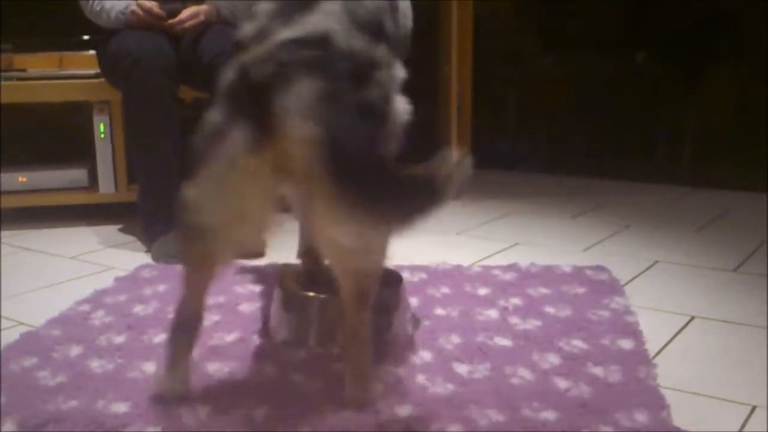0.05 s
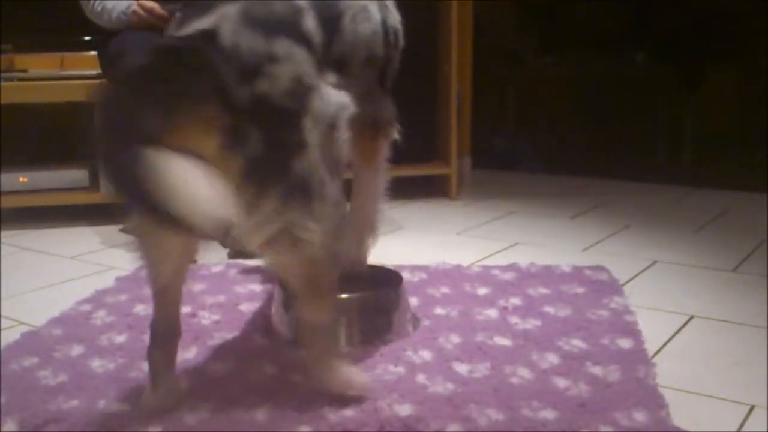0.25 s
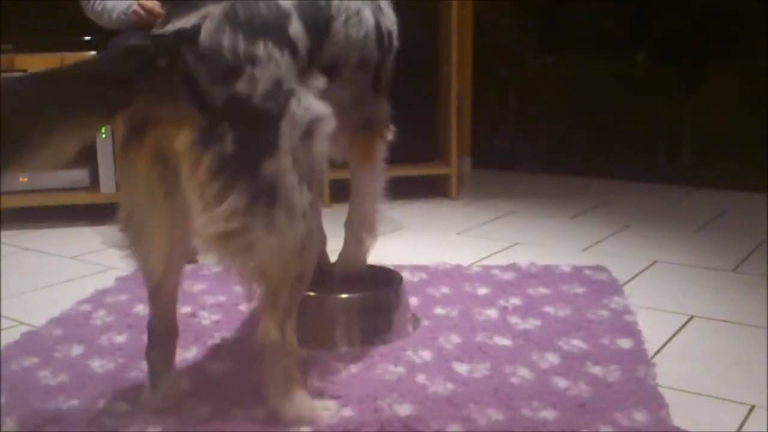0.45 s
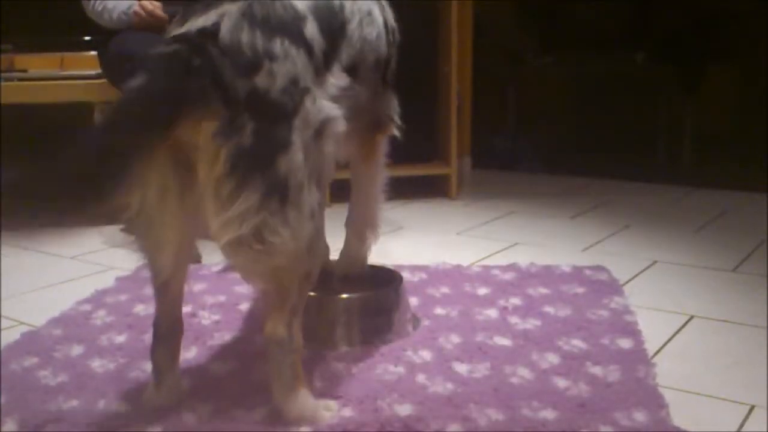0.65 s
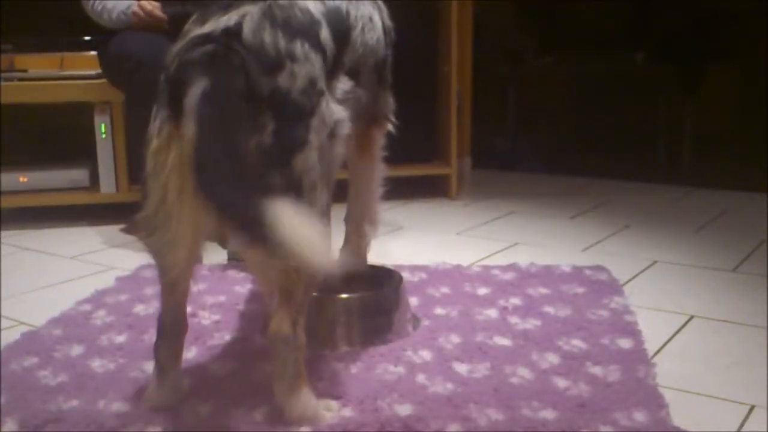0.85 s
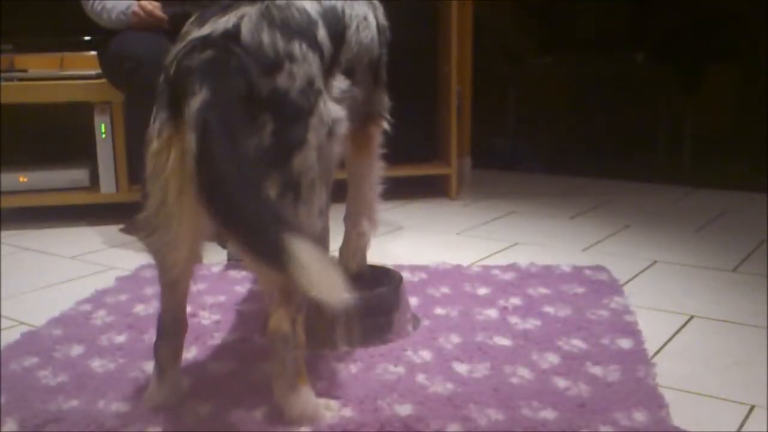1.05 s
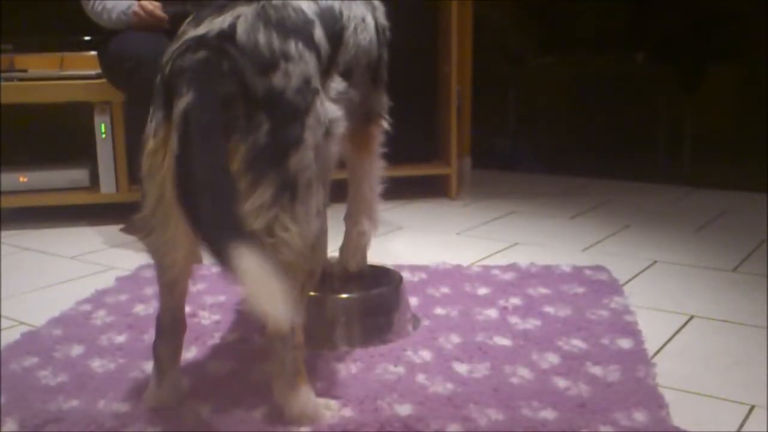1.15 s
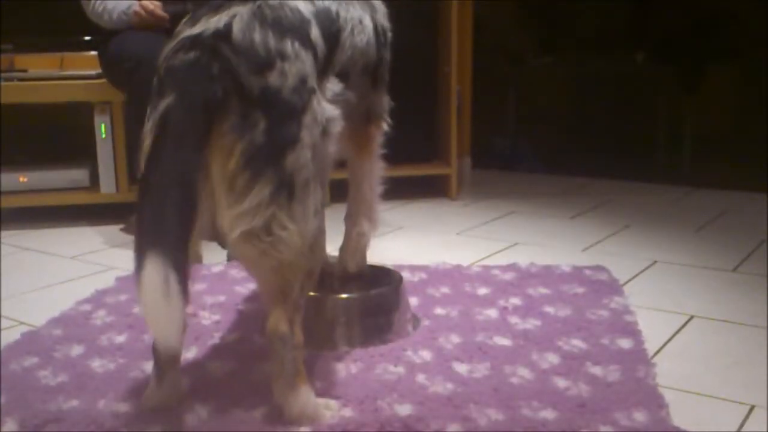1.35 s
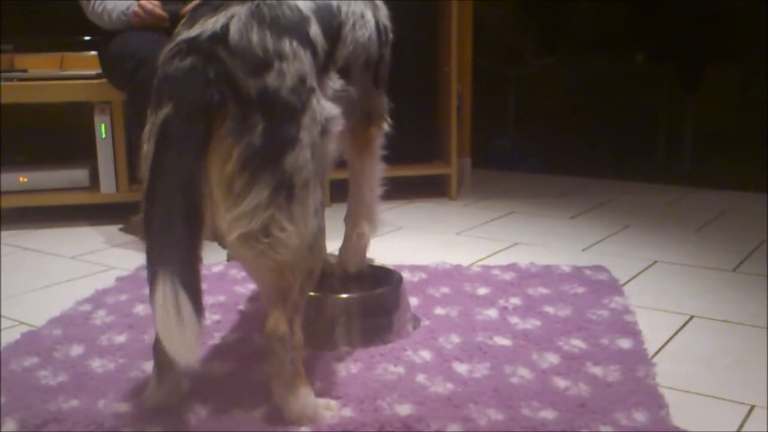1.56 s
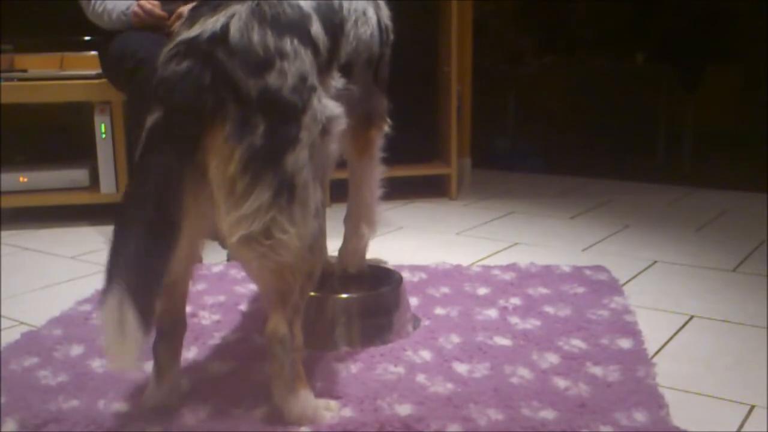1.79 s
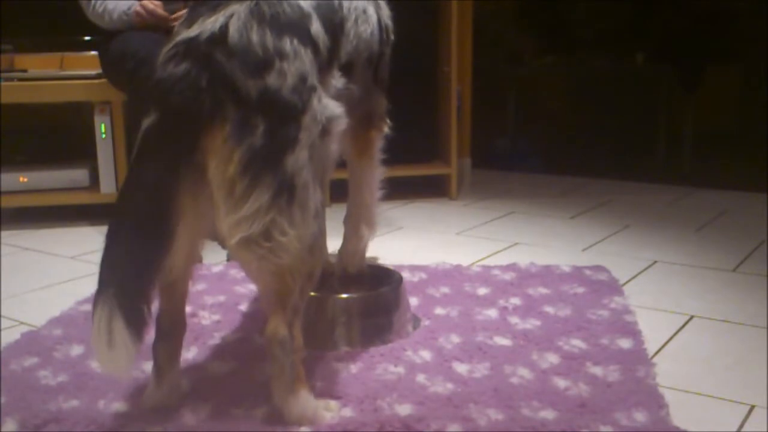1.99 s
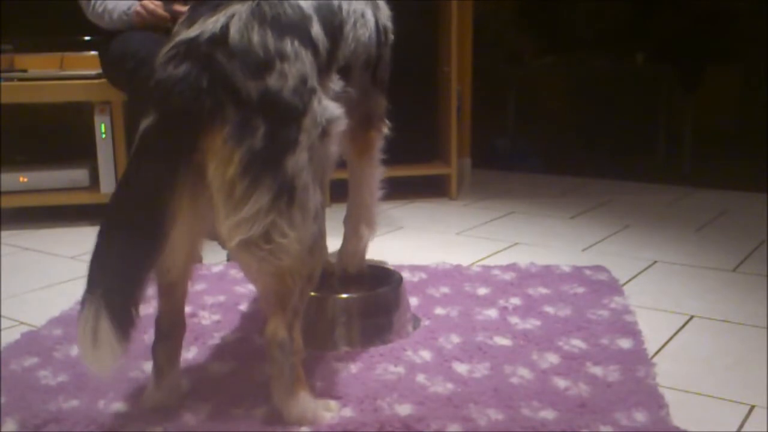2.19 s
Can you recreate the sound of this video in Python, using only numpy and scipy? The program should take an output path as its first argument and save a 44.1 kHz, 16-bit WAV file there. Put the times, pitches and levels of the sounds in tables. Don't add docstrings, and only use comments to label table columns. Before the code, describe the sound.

A loud training clicker dominates: a small tick at 0.18 seconds, a sharp metallic snap at 0.23 and another at 0.44, left of the microphone, clipped and ringing off tiled walls. Faint claw ticks on a metal bowl precede it near 0.07. Soft paw knocks and light scrapes follow at 0.6 to 0.8, 1.05 to 1.45, 1.7 and 2.05, with faint coat rustle around 0.7 to 1.3 and steady hiss.

```python
import sys
import numpy as np
from scipy import signal
from scipy.fft import rfft, irfft, next_fast_len
from scipy.io import wavfile
from scipy.ndimage import map_coordinates

SR = 44100
rng = np.random.default_rng(int(sys.argv[2]) if len(sys.argv) > 2 else 0)


def wav_out(sig):
    wavfile.write(sys.argv[1], SR, np.round(np.clip(np.atleast_2d(sig).T, -1, 1) * 32767).astype(np.int16))


def convert_level_to_amplitude(level_db):
    exponent = np.asarray(level_db, float) / 20
    return 10 ** exponent


N = 97020
TIME = np.arange(N) / SR
TOUCH_AT, PRESS_AT, RELEASE_AT = 0.1791, 0.2296, 0.4392


def along(points, hz):
    f, value = np.transpose(points)
    return np.interp(np.log(hz + 1), np.log(f + 1), value)


def filtered(x, response):
    size = next_fast_len(N + SR // 2)
    hz = np.fft.rfftfreq(size, 1 / SR)
    return irfft(rfft(x, size) * response(hz), size)[..., :N]


def causal(gain):
    def response(hz):
        cepstrum = irfft(np.log(gain(hz) + 1e-6))
        half = len(cepstrum) // 2
        cepstrum[1:half] *= 2
        cepstrum[half + 1:] = 0
        return np.exp(rfft(cepstrum))
    return response


def struck(start_s, db, decay_s, ring, rattle=1):
    def resonances(hz):
        power = 0
        for centre, width, level in ring:
            damping = (hz * width) ** 2
            power = power + convert_level_to_amplitude(level) ** 2 * damping / ((centre ** 2 - hz ** 2) ** 2 + damping)
        return np.sqrt(power)

    t = np.arange(SR // 10) / SR
    blow = (rattle * rng.standard_normal(len(t)) + (t == 0)) * np.exp(-t / decay_s)
    x = np.zeros(N)
    x[round(start_s * SR):][:len(t)] = blow
    y = filtered(x, causal(resonances))
    return convert_level_to_amplitude(db) * y / np.linalg.norm(y) * np.sqrt(SR / 200)


# delay t/s, left level/dB, right
# level/dB
WALL_PATHS = [(0, 3, -3), (.0012, 0, -5), (.0036, -7, -4), (.0066, 3, -3), (.0085, -1, -5), (.0118, 0, -1),
              (.0155, -5, -4), (.0215, -3, -5), (.033, -6, -4), (.038, -8, -8)]
# f/Hz, T60 t/s
REVERBERATION = [(300, .3), (1000, 0.84), (2000, 0.61), (3500, .55), (6000, 0.43), (10000, 0.29),
                 (15000, .24)]
# f/Hz, coherence [0-1]
COHERENCE = [(300, 0.74), (1500, .2), (3000, .3), (4500, .6), (7500, 0.44), (9000, .1), (15000, .3)]


def room(x, tail_db, paths):
    hz, t, z = signal.stft(rng.standard_normal((2, SR)), SR, nperseg=128)
    late = convert_level_to_amplitude(-60 * t / along(REVERBERATION, hz)[:, None])
    early = convert_level_to_amplitude(6.5 - 60 * t / 0.15)
    like = np.clip(along(COHERENCE, hz), 0, 1)[:, None]
    z = np.array([z[0], like * z[0] + np.sqrt(1 - like ** 2) * z[1]])
    tail = signal.istft(z * (late + early), SR, nperseg=128)[1][:, :SR]
    t = np.arange(SR) / SR
    tail *= 1 - np.exp(-t / 0.011)
    tail *= convert_level_to_amplitude(tail_db) / np.linalg.norm(tail, axis=1, keepdims=True)
    t = t[:200]
    for delay_s, left_db, right_db in paths:
        if delay_s:
            pulse = rng.standard_normal((2, 200)) * np.exp(-t / 0.0004)
        else:
            pulse = (t == 0) * np.ones((2, 1))
        pulse = pulse / np.linalg.norm(pulse, axis=1, keepdims=True)
        tail[:, round(delay_s * SR):][:, :200] += convert_level_to_amplitude([[left_db], [right_db]]) * pulse
    return signal.fftconvolve(x[None], tail, axes=1)[:, :N]


# f/Hz, density level/dB (per Hz)
HISS_SPECTRUM = [(25, -7), (60, 3), (200, -0.5), (600, -5), (1700, -7), (2400, -11.5), (11000, -15),
                 (15800, -20.5)]


def hiss():
    x = filtered(rng.standard_normal((2, N)), lambda hz: convert_level_to_amplitude(along(HISS_SPECTRUM, hz)))
    drift = map_coordinates(rng.standard_normal(30), [TIME * 8])
    dips = 0
    for snap_s in (PRESS_AT, RELEASE_AT):
        dips = dips + np.exp(-((TIME - snap_s - 0.075) / 0.035) ** 4)
    return convert_level_to_amplitude(-61.5 + 0.95 * drift - 14 * dips) * x / x.std()


# t/s, level/dB
COAT_SWING = [
    (0, -86),
    (0.701, -68.5),
    (1.25, -71),
    (1.45, -81),
    (2.2, -85),
]


def fur():
    centre_hz, width_hz = 9000, 9000
    x = filtered(rng.standard_normal((2, N)), lambda hz: np.exp(-((hz - centre_hz) / width_hz * 2) ** 2))
    return convert_level_to_amplitude(np.interp(TIME, *np.transpose(COAT_SWING))) * x / x.std()


NEAR_ROOM_DB = -5
# t/s, level/dB, f/Hz, scrape t/s
CLAW_TICKS = [
    (.066, -59.5, 9400, .006),
    (.074, -55, 9400, .003),
    (0.089, -55.5, 9426, 0.012),
    (.772, -52.5, 9300, .012),
    (1.056, -57.5, 9820, 0.0051),
    (1.13, -57.5, 8430, .018),
    (1.652, -60.5, 9600, 0.01),
    (1.729, -60, 10380, .002),
    (2.018, -58, 10300, 0.014),
]
# f/Hz, width/Hz, level/dB
CLAW_LOWER_MODES = [(4280, 900, -2.5), (6360, 580, -10)]


def claws():
    ticks = 0
    for start_s, db, hz, scrape_s in CLAW_TICKS:
        ring = [(hz, 1800, 0)] + CLAW_LOWER_MODES
        ticks = ticks + struck(start_s, db, scrape_s, ring)
    return room(ticks, NEAR_ROOM_DB, WALL_PATHS[:1])


# t/s, level/dB, f/Hz, width/Hz
PAD_KNOCKS = [(0.084, -53, 2020, 1220), (0.191, -64, 293, 101), (0.579, -53.5, 273, 145.5),
              (.72, -48, 900, 399), (1.06, -60.5, 750, 60), (1.14, -56, 740, 40), (1.21, -55, 740, 700),
              (1.24, -56.5, 605, 400), (1.425, -55.5, 736, 25), (1.418, -50.5, 790, 500),
              (2.09, -59, 1600, 200), (2.09, -59, 3654, 300)]


def pads():
    knocks = 0
    for start_s, db, hz, width in PAD_KNOCKS:
        knocks = knocks + struck(start_s, db, 0.025, [(hz, width, 0)])
    return room(knocks, NEAR_ROOM_DB, [(0.0026, 0.0015, -1)])


# f/Hz, width/Hz
TOUCH_MODES = [(290, 120), (1700, 300), (3250, 300), (4080, 250), (5500, 900), (6600, 500), (8300, 700),
               (10000, 450), (11100, 900), (14600, 700)]
PRESS_MODES = [(1640, 220), (2400, 600), (3250, 450), (4300, 600), (5300, 400), (5800, 500), (8650, 500),
               (9700, 350), (10650, 350), (12100, 700), (14600, 900), (15600, 300)]
RELEASE_MODES = [(1680, 220), (2600, 500), (3420, 330), (4200, 600), (5900, 800), (6900, 600), (8800, 500),
                 (9720, 230), (11200, 500), (12500, 1300), (15550, 300)]
TOUCH_HEIGHTS = [-10.5, -5, -7.5, 6, -11, -9, -8, 0, -9, -13]
PRESS_HEIGHTS = [-3.5, -13, -5.5, -18, -2, -4.5, -4, -7, 1.5, -10.5, -9.5, -17]
RELEASE_HEIGHTS = [-3, -11, 4.5, -11, -9, -15.5, -17, 3, -9.5, -7, -21.5]


def clicker():
    def small_case(hz):
        low_hz = 1250
        return (hz * hz / (hz * hz - low_hz ** 2 - 1.4j * hz * low_hz)) ** 3

    touch = struck(TOUCH_AT, -38, 0.004, np.c_[TOUCH_MODES, TOUCH_HEIGHTS], rattle=0.12)
    press = struck(PRESS_AT, -9.5, 0.002, np.c_[PRESS_MODES, PRESS_HEIGHTS], rattle=0.03)
    release = struck(RELEASE_AT, -7, 0.002, np.c_[RELEASE_MODES, RELEASE_HEIGHTS], rattle=0.03)
    sound = room(touch, 5.5, WALL_PATHS[:3])
    for snap in (press, release):
        sound = sound + room(filtered(snap, small_case), 7, WALL_PATHS)
    return sound


# f/Hz, level/dB
LEFT_RESPONSE = [(300, 1.5), (2000, -1.5), (4200, -5.5), (7000, 2), (8500, 2), (10500, 4), (13500, -3.5),
                 (16000, -3)]
RIGHT_RESPONSE = [(300, 9.5), (2000, -7.5), (4200, -1.5), (7000, 2), (8500, -11.5), (11000, -16),
                  (13500, -4), (16000, -2)]


def scene():
    def ports(hz):
        return convert_level_to_amplitude([along(LEFT_RESPONSE, hz), along(RIGHT_RESPONSE, hz)])

    return filtered(clicker() + claws() + pads(), ports) + fur() + hiss()


def band_limit(x):
    return signal.sosfilt(signal.butter(12, 15800, fs=SR, output="sos"), x)


def record(dry):
    top, hardness = 1.02 + 0.03 * np.sign(dry), 15
    mix = dry / (1 + np.abs(dry / top) ** hardness) ** (1 / hardness)
    return band_limit(mix)


dry = scene()
out = record(dry)
wav_out(out)
```